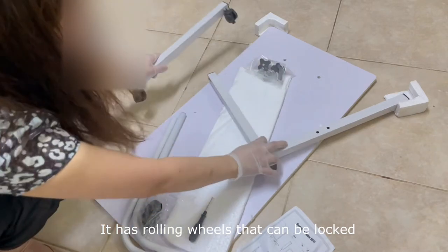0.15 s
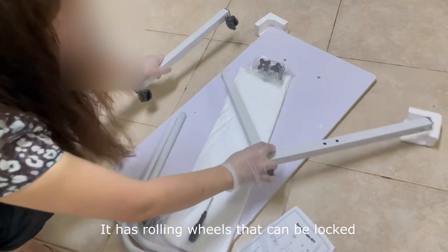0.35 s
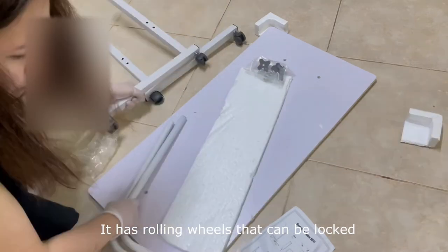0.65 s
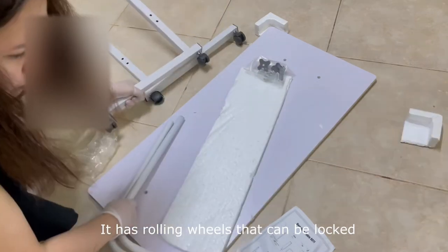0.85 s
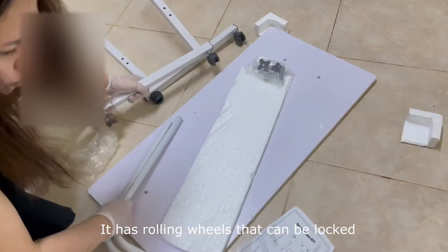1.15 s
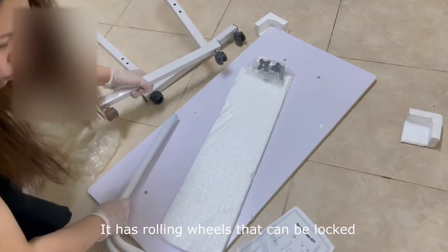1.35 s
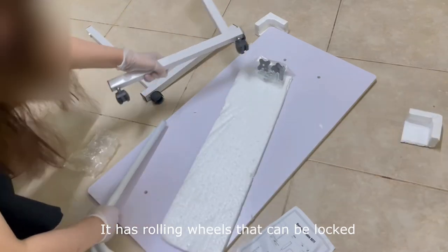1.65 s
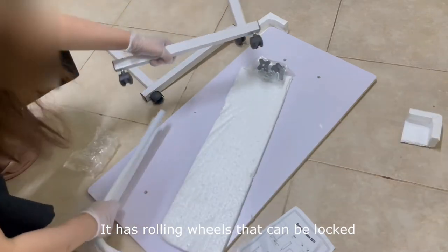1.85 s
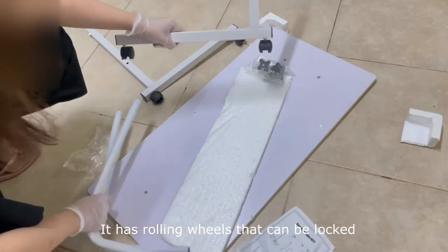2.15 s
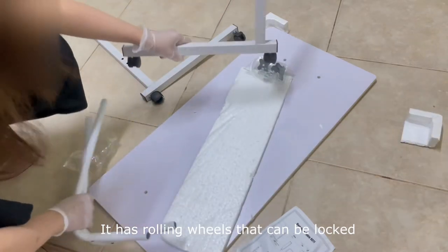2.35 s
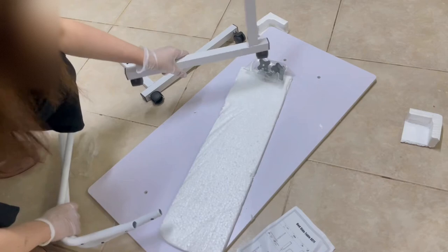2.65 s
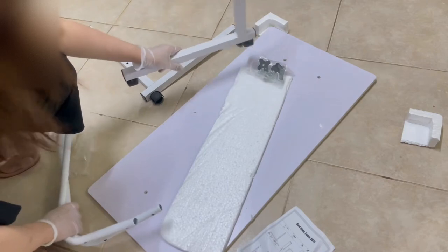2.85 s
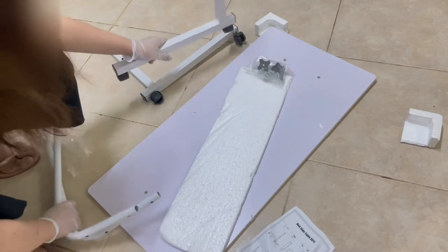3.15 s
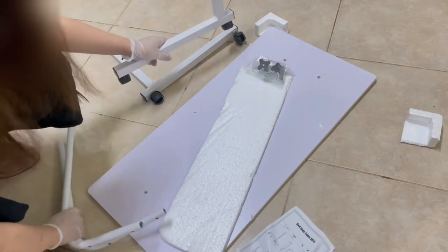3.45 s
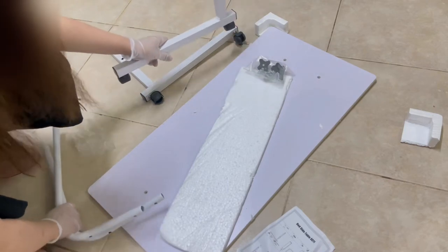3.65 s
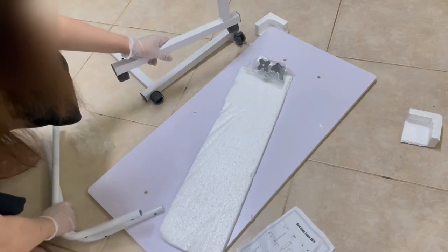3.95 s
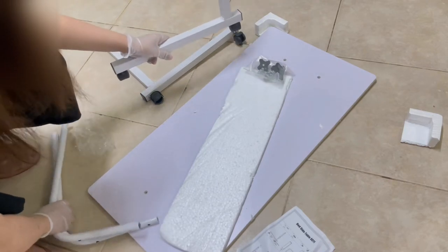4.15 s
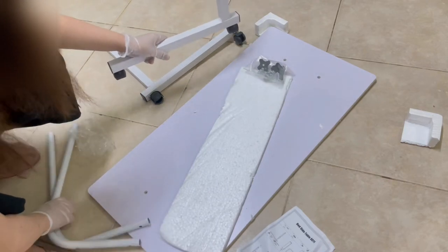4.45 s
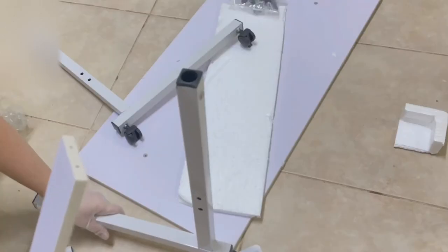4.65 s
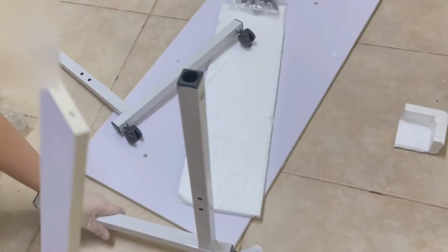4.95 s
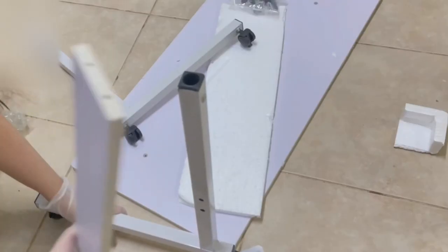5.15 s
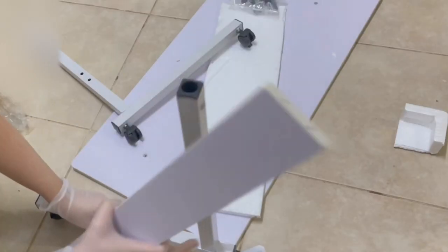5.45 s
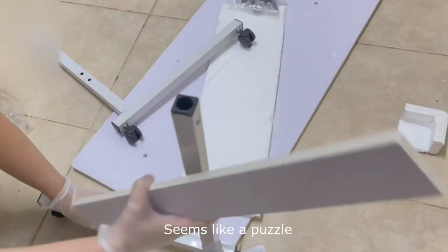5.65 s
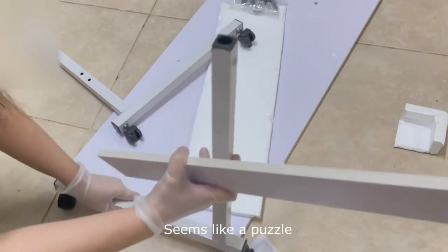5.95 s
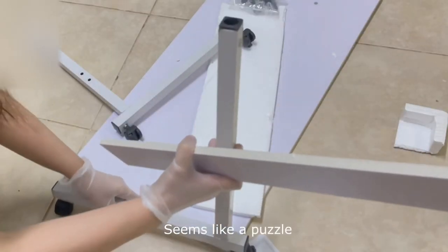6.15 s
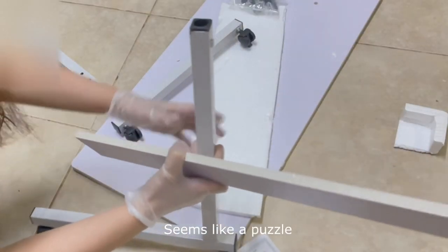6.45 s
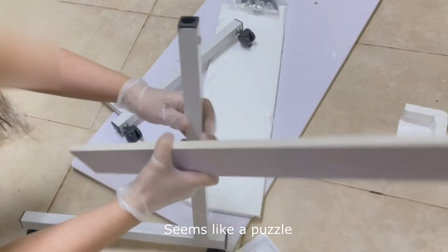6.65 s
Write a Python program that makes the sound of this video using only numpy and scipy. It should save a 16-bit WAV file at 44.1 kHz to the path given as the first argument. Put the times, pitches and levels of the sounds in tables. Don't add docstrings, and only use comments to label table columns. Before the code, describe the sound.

Gloved hands rustle and slide metal desk legs on tile, casters knock and a leg clangs, then a loud tube clang before quieter board taps.

```python
import sys
import numpy as np
from scipy import signal
from scipy.fft import rfft, irfft, next_fast_len
from scipy.io import wavfile
from scipy.ndimage import uniform_filter1d, minimum_filter1d, map_coordinates

SR = 44100
rng = np.random.default_rng(int(sys.argv[2]) if len(sys.argv) > 2 else 0)


def decibels_to_gain(level_db):
    exponent = np.asarray(level_db, float) / 20
    return 10 ** exponent


def unload_audio(sound):
    columns = np.transpose(np.atleast_2d(sound))
    steps = np.round(np.clip(columns, -1, 1) * 32767)
    wavfile.write(sys.argv[1], SR, steps.astype(np.int16))


N = 300321
TIME = np.arange(N) / SR
AGE = np.arange(SR // 2) / SR

# fade_start_s, silent_s, sound_back_s
CUT = (4.508, 4.518, 4.535)


def unit(x):
    return x / np.sqrt(np.mean(x ** 2) + 1e-20)


def along(points, hz):
    f, v = np.transpose(points)
    return np.interp(np.log(hz + 1), np.log(f + 1), v)


def curves(rows):
    s, *cols = np.transpose(rows)
    return [np.interp(TIME, s, c) for c in cols]


def wobble(rate):
    knots = rng.standard_normal(int(N * rate / SR) + 4)
    return map_coordinates(knots, [np.arange(N) * rate / SR])


def filtered(x, response):
    m = next_fast_len(x.shape[-1] + 8192)
    return irfft(rfft(x, m) * response(np.fft.rfftfreq(m, 1 / SR)), m)[..., :x.shape[-1]]


# freq_hz, likeness_0_to_1
ALIKE = [(60, .98), (250, .8), (1000, .5), (3000, .65), (7000, .88), (8300, .99), (16000, .99)]


def spread(hz):
    return np.arccos(np.clip(along(ALIKE, hz), -1, 1)) / 2


def pair(x, spectrum):
    mid, side = filtered(x, lambda hz: decibels_to_gain(along(spectrum, hz)) * [np.cos(spread(hz)), np.sin(spread(hz))])
    return unit(np.array([mid + side, mid - side]))


def rush(spectrum, patchy_db, grain_db=0):
    grain = decibels_to_gain(grain_db * uniform_filter1d(rng.exponential(size=N), 24) * 4)
    z = signal.stft(rng.standard_normal((2, N)) * grain, nperseg=512)[2]
    field = uniform_filter1d(rng.standard_normal(z.shape[1:]), 6, 0)
    field = unit(uniform_filter1d(field, 10, 1))
    noise = signal.istft(z * decibels_to_gain(patchy_db * field), nperseg=512)[1][:, :N]
    return pair(noise, spectrum)


FLUTTER_HZ = 70


def ring(modes, scatter_db, attack, free=1, flutter_db=0):
    hz, db, t60 = np.transpose(modes)[:, :, None]
    knots = rng.standard_normal((len(hz), FLUTTER_HZ))
    flutter = np.array([np.interp(AGE * FLUTTER_HZ, np.arange(FLUTTER_HZ), row) for row in knots])
    level_db = db + scatter_db * rng.standard_normal(hz.shape) + flutter_db * flutter
    strength = decibels_to_gain(level_db - 60 * AGE / (t60 * free))
    phase = 2 * np.pi * (hz * AGE + rng.random(hz.shape))
    step = np.sqrt(-np.log(along(ALIKE, hz)) / 2) * rng.standard_normal(hz.shape)
    sides = [np.sum(strength * np.sin(phase + side * step), axis=0) for side in (1, -1)]
    return np.array(sides) * (1 - np.exp(-AGE / attack))


def crack(t60, lo_hz, hi_hz, attack):
    turn = spread(np.sqrt(lo_hz * hi_hz))
    mid, side = rng.standard_normal((2, len(AGE))) * [[np.cos(turn)], [np.sin(turn)]]
    burst = np.array([mid + side, mid - side]) * decibels_to_gain(-60 * AGE / t60) * (1 - np.exp(-AGE / attack))
    band = signal.butter(3, [lo_hz, hi_hz], "band", fs=SR, output="sos")
    burst = signal.sosfilt(band, burst)
    return burst / np.abs(burst).max()


# freq_hz, t60_s
WALLS = [(200, 0.26), (1200, 0.36), (4000, 0.48), (10000, 0.3)]


def add(bus, s, sound, wet_db):
    hz, t, z = signal.stft(rng.standard_normal((2, len(AGE))), SR, nperseg=256)
    decay = decibels_to_gain(-60 * t / along(WALLS, hz)[:, None])
    tail = signal.istft(z * decay, SR, nperseg=256)[1][:, :len(AGE)]
    late = np.clip(AGE / 0.0041 - .5, 0, 1)
    tail = pair(tail * late, [(1, 0)]) / np.sqrt(len(AGE))
    both = decibels_to_gain(wet_db) * signal.fftconvolve(np.atleast_2d(sound)[:1], tail, axes=1)
    both[:, :len(AGE)] += sound * np.clip((AGE[-1] - AGE) * 10, 0, 1)
    end = CUT[1] if s < CUT[0] else N / SR
    start = round(s * SR)
    both = both[:, :round(end * SR) - start]
    bus[:, start:start + both.shape[1]] += both


SWELL_DB, RELEASE_DB_PER_S = 30, 170


def strokes(rows, idle_db):
    s, swell, hold, db = np.transpose(rows)[:, :, None]
    t = np.arange(0, N, 16) / SR
    before = np.clip(s - t, 0, None)
    after = np.clip(t - s - abs(hold), 0, None)
    shape_db = -SWELL_DB * before / abs(swell) - RELEASE_DB_PER_S * after
    shape_db = np.where((s < CUT[0]) & (t > CUT[1]), -200, shape_db)
    power = np.sum(decibels_to_gain(2 * np.maximum(db + shape_db, -200)), axis=0)
    return 10 * np.log10(np.interp(TIME, t, power) + decibels_to_gain(2 * idle_db))


# time_s, level_db, pitch_hz
DRONE = [(0.0, -63, 57.58), (0.3, -54, 59.3), (0.57, -66.5, 67.74), (1.35, -57.5, 58.3),
         (1.95, -63.5, 72.12), (2.5, -65.5, 57.95), (2.8, -61.5, 60.74), (3.43, -61, 60.1),
         (3.9, -64, 71.15), (4.1, -58, 57), (4.48, -70, 46.2), (4.56, -59, 43.76), (5.1, -58.5, 44.97),
         (5.2, -65, 50.07), (5.45, -53.5, 55.38), (5.8, -53.5, 57.3), (6.81, -56, 63.25)]
# freq_hz, level_db_per_hz
THROB = [(15, -42.5), (28, -13.5), (45, -4.5), (62, -4.5), (80, -8.5), (105, -19.5), (140, -52)]
# freq_hz, level_db_per_hz
AIR = [(53, -29.5), (90, -6.5), (171, -4.5), (267, -3), (432, -20), (468, -18), (584, -17.5), (758, -23),
       (873, -18.5), (1840, -53.5), (2920, -15), (3290, -39), (3790, -22.5), (4920, -57.5), (11000, -38.5),
       (14300, -68), (22000, -120)]
# pitch_hz, level_db
MACHINES = [(721, -81.5), (899, -76), (1198, -81.5), (1404, -86.5), (2400, -84.5), (2884, -79.5),
            (3800, -90.5)]
AIR_DB = -63


def room_tone():
    lines = 0
    for hz, db in MACHINES:
        level = decibels_to_gain(db + 3 + 0.84 * wobble(5.5))
        lines = lines + level * np.sin(2 * np.pi * hz * (TIME + 0.00013 * wobble(3.7)))
    drone_db, drone_hz = curves(DRONE)
    drone = decibels_to_gain(-1.0 + 1.4 * wobble(4.3)) * np.sin(2 * np.pi * np.cumsum(drone_hz) / SR)
    drone = drone + 0.81 * rush(THROB, patchy_db=4.0)
    return decibels_to_gain(AIR_DB - 1.5) * rush(AIR, patchy_db=1.4) + decibels_to_gain(drone_db) * drone + lines


# full_s, swell_s, hold_s, level_db
RUSTLES = [(0.001, 0.017, 0.0052, -37), (.09, 0.037, 0.21, -49.5), (.328, .02, 0.0046, -48),
           (.506, 0.018, 0.12, -58), (1.218, 0.35, 0.004, -57.5), (1.486, 0.13, 0.04, -53.5),
           (1.826, 0.041, 0.0067, -53.5), (2.352, .02, .06, -65.5), (2.49, 0.11, 0.056, -59),
           (2.65, 0.93, 0.033, -66.5), (2.904, 0.0081, 0.0032, -52), (2.95, .05, 0.04, -64),
           (3.102, 0.019, 0.11, -62), (3.37, 0.0097, 0.0039, -55.5), (3.6, 0.33, 0.043, -74),
           (3.965, 0.31, 0.2, -58.5), (4.348, 0.1, .01, -51.5), (5.01, 0.015, 0.13, -55.5),
           (5.088, 0.037, 0.031, -50), (5.22, 0.056, 0.023, -57), (5.35, 0.045, 0.24, -80),
           (5.71, 0.1, 0.19, -63.5), (6.15, 0.041, 0.049, -65.5), (6.3, 0.029, 0.023, -71),
           (6.485, 0.054, 0.0075, -52), (6.63, 0.3, 0.016, -54.5)]
# full_s, swell_s, hold_s, rub_db, drag_db
SLIDES = [(0.001, .01, 0.052, -48.5, -65), (0.092, 0.08, 0.25, -55.5, -60.5),
          (0.5, 0.015, 0.17, -56.5, -48.5), (1.095, 0.32, 0.084, -63, -58),
          (1.257, 0.052, 0.0087, -57.5, -48), (1.539, 0.14, 0.023, -43, -40.5),
          (1.59, 0.056, 0.22, -46.5, -52), (2.685, 0.84, 0.034, -59.5, -56.5),
          (2.911, 0.41, 0.085, -57, -60), (3.105, 0.027, 0.011, -58, -60), (3.379, 0.14, 0.009, -62.5, -59),
          (3.966, 0.079, 0.2, -51.5, -53), (4.246, 0.1, 0.011, -53.5, -56.5),
          (5.105, 0.29, 0.14, -62.5, -71), (5.714, 0.13, 0.0063, -52.5, -61), (5.855, .2, 0.02, -56, -84),
          (6.137, 0.02, .005, -49.5, -58.5), (6.511, 0.065, 0.11, -50.5, -59),
          (6.627, 0.036, 0.0089, -41, -67.5)]
# freq_hz, level_db_per_hz
HISS = [(1500, -44), (3200, -9.5), (4800, -2), (6500, -1.5), (9000, 3.5), (10400, -5.5), (11500, -13.5),
        (13000, -14.5), (16000, -17.5)]
SHEEN = [(9800, -51.5), (10600, -12.5), (12400, 0.5), (13200, -20), (15300, -3), (16300, -54)]
RUB = [(700, -42), (1500, -2.5), (2600, 1), (4200, -12), (7500, -29)]
DRAG = [(120, -53), (280, -4.5), (700, -4.5), (1400, -8.5), (3000, -40.5)]
IDLE_HISS_DB, IDLE_HISS_LATER_DB, IDLE_RUB_DB, IDLE_DRAG_DB = -76.5, -98, -74, -66.5


def hands():
    hiss_db = strokes(RUSTLES, np.where(TIME < CUT[1], IDLE_HISS_DB, IDLE_HISS_LATER_DB))
    rub_db = strokes([(s, swell, hold, db) for s, swell, hold, db, _ in SLIDES], IDLE_RUB_DB)
    drag_db = strokes([(s, swell, hold, db) for s, swell, hold, _, db in SLIDES], IDLE_DRAG_DB)
    hiss = decibels_to_gain(hiss_db - 3.0 + 0.64 * wobble(35)) * rush(HISS, patchy_db=2.5, grain_db=2.0)
    rub = decibels_to_gain(rub_db - 7.0 + 0.69 * wobble(25)) * rush(RUB, patchy_db=0.0, grain_db=3.0)
    drag = decibels_to_gain(drag_db - 3.0 + 0.39 * wobble(28)) * rush(DRAG, patchy_db=2.5, grain_db=1.5)
    sheen = decibels_to_gain(1.67 * hiss_db + 30) * rush(SHEEN, patchy_db=2.0, grain_db=2.5) * [[1], [-1]]
    return hiss + sheen + rub + drag


# start_s, low_1khz_db, mid_3khz_db, high_8khz_db, freedom_to_ring_0_to_1
CLANGS = [
    (0.004, -60, -44, -37, 0.2),
    (4.391, -19, -12, -25, 0.35),
    (4.3943, -32, -23.5, -7, 0.43),
    (4.417, -33.5, -27.5, -15.5, 0.12),
    (4.4247, -34.5, -25, -16.5, 0),
    (4.4395, -37, -25.5, -22, .1),
    (4.461, -25.5, -29.5, -26, 0.2),
]
END_BLOWS = [
    (4.3619, -31, -17, -12.5, 0.41),
]
LEG_BLOWS = [
    (1.5444, -25.5, -14, -8, 0.13),
    (1.547, -26.5, -20, -7, 0.069),
    (1.55, -19, -20.5, -6, 0.06),
    (1.5531, -20, -25, -26.5, .12),
    (1.564, -24.5, -28.5, -28, .08),
    (1.584, -35.5, -29.5, -26, 0.059),
    (1.612, -20.5, -23, -29, .14),
    (1.6505, -26, -25.5, -24, .15),
]
FRAME_BLOWS = [(3.2468, -40.5, -27.5, -29, 0.1), (3.2505, -40, -43, -32.5, .12), (3.266, -48, -38, -48, .1),
               (3.272, -54, -42, -35, 0.08), (3.275, -44, -46, -40, .05), (3.758, -40, -28.5, -33.5, 0.088),
               (3.776, -44, -52, -48, 0.12), (4.184, -39, -36, -36, 0.15), (4.187, -37, -33, -35, 0.14),
               (4.192, -37.5, -34, -33.5, 0.21), (4.197, -35.5, -33, -33.5, 0.1),
               (4.2033, -32.5, -39, -44, .1)]
TUBE_HZ = [668, 1104, 1345, 1640, 2176, 2421, 2454, 2642, 3198, 3575, 3604, 4575, 4650, 4775, 4824, 5566,
           5992, 6288, 6644, 6741, 7144, 7526, 7747, 8104, 8183, 8690, 8796, 9112, 9314, 9749, 11190, 11420,
           11850, 12110, 12350]
# level_db, t60_s
TUBE = [(-12.5, 0.89), (-18, 0.26), (6, 0.32), (-10, 0.43), (-11.5, 2), (-2, 0.5), (-7.5, 0.87),
        (-4.5, 0.4), (-7.5, 1.8), (-3.5, 1), (-7, 0.8), (-4, .8), (-7, 1.2), (-12.5, .6), (-8.5, .6),
        (-16.5, 0.5), (-17, 1), (-15.5, 0.6), (-15, 1.5), (-18, 1), (-21, 0.68), (-14.5, 0.88), (-20, 0.5),
        (-6.5, 0.29), (-18, 0.4), (-25, 0.8), (-7.5, 0.9), (-23, 1.4), (-17.5, 0.36), (-19.5, 1.2),
        (-23.5, 1.1), (-18.5, .5), (-19.5, .9), (-6, 0.5), (-9.5, .3)]
# pitch_hz, level_db, t60_s when free
END = [(666, -9.5, .8), (1628, -9, .9), (2180, -7, .9), (2650, -4.5, 0.29), (3627, -2, 0.62),
       (4576, -6, 0.46), (5520, -8.5, 0.39), (6029, -13, 0.84), (7640, -13, 0.46), (8678, -5, 0.25),
       (9330, -8.5, 0.4), (9690, -8.5, 0.79), (11230, -8, .3), (12110, -13.5, .3)]
LEG = [(883, -8, .5), (1105, -3, 0.8), (1377, -3, 0.8), (1577, -9, .6), (2020, -9, .6), (5609, -19, 0.71),
       (6300, -15.5, .8), (6864, -16.5, 0.68), (2412, 2, 0.88), (2690, -7.5, .6), (3164, -10.5, 0.7),
       (3600, -7, .8), (5020, -18.5, 0.96), (7540, -2.5, 0.29), (8280, -13, 0.65), (8780, -2, .4),
       (9040, 2.5, 0.27), (9800, -10.5, 0.67), (11100, -3, .55), (12400, -14, .9)]
FRAME = [(644.5, -6.5, 0.96), (1467, -6.5, 0.7), (1810, -7.5, 0.8), (2180, -10, 1), (2534, -9.5, 1.3),
         (2706, -4.5, 1.1), (3615, -6, 1), (4680, -11, 0.82), (4900, -14, 0.54), (5564, -12.5, 0.64),
         (6170, -15.5, .6), (6670, -15.5, .6), (7740, -14, .6), (8580, -8, 0.47)]
# low_hz, high_hz
SKIN = [(500, 1800), (1900, 3750), (4600, 12700)]


def clang(modes, blow, crack_db, skin_db, top_hz):
    _, low_db, mid_db, high_db, free = blow
    where = [(1000, low_db), (3000, mid_db), (8000, high_db)]
    free = np.clip(free, .03, 2)
    struck = [(hz, db + along(where, hz), t60) for hz, db, t60 in modes]
    tone = ring(struck, scatter_db=1.0, attack=0.00079, free=free, flutter_db=1.5)
    sound = decibels_to_gain(1.5) * free ** 0.5 * tone
    for (hz, part_db), (lo_hz, hi_hz) in zip(where, SKIN):
        contact = crack(0.0069, hz * .5, min(hz * 2.09, top_hz), attack=0.000079)
        sound += decibels_to_gain(part_db + crack_db) * contact
        walls = crack(0.56 * free, lo_hz, min(hi_hz, top_hz), attack=0.0003)
        sound += decibels_to_gain(part_db + skin_db) * walls
    return sound + decibels_to_gain(low_db - 18.5) * crack(0.021, 72, 300, attack=0.0012)


def tubes():
    bus = np.zeros((2, N))
    tube = [(hz, *mode) for hz, mode in zip(TUBE_HZ, TUBE)]
    # modes, blows, crack_db, skin_db, room_db, top_hz
    parts = [(tube, CLANGS, 3.5, -4.5, -7, 16500),
             (END, END_BLOWS, 1.5, -4, -7, 16500),
             (LEG, LEG_BLOWS, -1.5, -6.5, -9, 16500),
             (FRAME, FRAME_BLOWS, 3, -5, -7, 10000)]
    for modes, blows, crack_db, skin_db, room_db, top_hz in parts:
        for blow in blows:
            add(bus, blow[0], clang(modes, blow, crack_db, skin_db, top_hz), wet_db=room_db)
    return filtered(bus, lambda hz: decibels_to_gain(-14 * np.exp(-((hz - 4150) / 170) ** 2)))


# start_s, peak_db, pitch_hz, bright_db
RATTLES = [(0.327, -50, 2060, 21), (.255, -58.5, 450, -14), (.335, -51.5, 616, -10),
           (1.6122, -16, 2710, -2), (1.6193, -12, 2650, -19), (1.667, -18.5, 3000, -12),
           (1.683, -24, 2600, -15), (1.694, -25, 1500, -20), (1.885, -34, 1500, -15),
           (1.932, -27, 1800, -25), (1.941, -32, 2300, -25), (1.9142, -27, 3600, -4),
           (2.349, -48.5, 2957, 5), (2.43, -54, 4000, -2.5), (2.551, -47, 3970, 0), (2.563, -46, 4000, -5),
           (2.81, -51.5, 2500, 3), (2.909, -41, 3300, 11), (3.098, -46, 3500, 5), (2.6117, -44.5, 1276, 11),
           (2.615, -50, 5000, 6), (2.6562, -39, 3230, 8), (2.6692, -35.5, 3600, 7.5),
           (2.6871, -40, 3480, 4), (2.7107, -44, 1665, 5), (2.8767, -43, 3200, -5),
           (2.9046, -33.5, 3300, 10.5), (2.932, -33, 3540, 4), (2.972, -41, 1790, 12),
           (3.02, -48.5, 1440, 8.5), (3.105, -51, 1502, 17.5), (3.3698, -39.5, 1390, 7.5),
           (3.5554, -46, 1440, 9), (3.641, -66, 4000, 10), (3.792, -52, 3000, 5), (3.97, -37, 1700, -1),
           (4.087, -45, 2407, -10), (4.1177, -53, 2480, 10), (4.132, -54, 5000, 8)]
# start_s, peak_db, pitch_hz, bright_db
TAPS = [(5.095, -49, 1400, -8), (4.7464, -61, 1191, -34), (5.696, -42, 2440, -1),
        (5.7223, -26.5, 1980, -31), (6.1355, -29.5, 1835, -23.5), (6.1404, -32, 2336, -36),
        (6.311, -45, 1900, -30), (6.323, -42.5, 2100, -30), (6.454, -42, 2110, -30), (6.478, -33, 4180, 0),
        (6.487, -36, 2620, -15), (6.5023, -38, 2600, -15), (6.509, -44, 4200, -20),
        (6.5197, -33, 2250, -34), (6.573, -42, 1500, -27.5), (6.591, -22.5, 2290, -39),
        (6.6178, -39, 5930, -23), (6.623, -36, 2542, -30), (6.6298, -31.5, 5400, -24),
        (6.6294, -24.5, 1600, -27), (6.6836, -45, 1508, -13), (6.638, -37, 3100, -25),
        (6.654, -42, 2010, -25.5), (6.719, -46, 2300, -30)]
DULL_DB, DULL_DB_PER_OCTAVE = -1.5, -13


def ticks():
    bus = np.zeros((2, N))
    for s, db, hz, bright_db in RATTLES + TAPS:
        size = 1 if s < CUT[0] else 1.4
        dull_db = DULL_DB + DULL_DB_PER_OCTAVE * np.log2(hz / 1000)
        tone = .35 * ring([(hz, 0, .01)], scatter_db=0, attack=.0004)
        tone += crack(.009 * size, hz * .6, hz * 1.5, attack=.0003)
        dull = decibels_to_gain(dull_db) * crack(0.043, 370, 1210, attack=0.00093)
        bright = decibels_to_gain(bright_db + 0.5) * crack(0.0034, 5500, 12500, attack=0.00032)
        add(bus, s, decibels_to_gain(db - 2.0) * (tone + dull + bright), wet_db=-6.5)
    return bus


# start_s, peak_db, snap_db, wheel_pitch_factor, fork_db
KNOCKS = [
    (1.2505, -37, -13, 1, -40),
    (1.6107, -15, -20, 1.73, -42),
    (1.6156, -15, -20, 1.27, -38),
    (1.65, -24.5, 8, 1.9, -38),
    (1.864, -18, 2, 1.04, -27),
    (1.9146, -14.5, -25, 1.044, -27),
]
# pitch_hz, level_db, t60_s
WHEEL = [(165, -19.5, 0.094), (365, -17, 0.065), (610, -10.5, 0.034), (945, 0, 0.019), (1070, 4, 0.029),
         (1504, -1.5, 0.027), (1824, -9, 0.015), (2240, -11, 0.013), (3000, -11, 0.015)]
FORK_HZ, FORK_T60_S = 6336, .1


def casters():
    bus = np.zeros((2, N))
    lag_s = .003
    for s, db, snap_db, pitch, fork_db in KNOCKS:
        hollow = decibels_to_gain(-7.5) * ring(np.multiply(WHEEL, [pitch, 1, 1]), scatter_db=-1.5, attack=0.00048)
        wheel = 0.42 * crack(0.096, 900 * pitch, 2300 * pitch, attack=0.00049)
        wheel += 0.19 * crack(0.064, 220, 1100, attack=0.0014)
        wheel += 0.11 * crack(0.041, 2300, 6500, attack=0.0003)
        snap = crack(0.012, 8140, 9300, attack=0.00093) + 1.1 * crack(0.023, 6800, 13000, attack=0.00032)
        knock = np.roll(wheel, round(lag_s * SR), axis=1) + decibels_to_gain(snap_db) * snap
        steel = ring([(FORK_HZ, fork_db, FORK_T60_S)], scatter_db=0, attack=.003, flutter_db=1.5)
        add(bus, s + lag_s, decibels_to_gain(db) * hollow, wet_db=-11.5)
        add(bus, s, decibels_to_gain(db) * knock, wet_db=-7.5)
        if db > -30:
            add(bus, s, decibels_to_gain(db) * steel, wet_db=-15)
    return bus


AXLE_HZ, AXLE_T60_S, AXLE_DB = 4888, 1.05, -41
AXLE_STRUCK_S, AXLE_TOUCHED_S, AXLE_HELD_DB_PER_S = 1.612, 2.1, 300


def axle():
    age = np.clip(TIME - AXLE_STRUCK_S, 0, None)
    held = np.clip(age - AXLE_TOUCHED_S + AXLE_STRUCK_S, 0, None)
    level_db = AXLE_DB - 60 * age / AXLE_T60_S - AXLE_HELD_DB_PER_S * held + 1.5 * wobble(30.03)
    return decibels_to_gain(level_db) * (1 - np.exp(-age / .03)) * np.sin(2 * np.pi * AXLE_HZ * age)


# start_s, peak_db, pitch_hz, t60_s
PINGS = [
    (1.651, -44, 11300, 0.24),
    (1.652, -44, 12090, 0.26),
    (1.73, -43.5, 2460, 0.22),
    (1.818, -46, 6400, .12),
    (2.965, -52, 469, .12),
    (6.477, -27, 2310, 0.025),
    (6.579, -38, 4300, 0.018),
    (6.636, -44, 3104, 0.16),
]


def pings():
    bus = np.zeros((2, N))
    for s, db, hz, t60 in PINGS:
        note = ring([(hz, db + 0.5, t60)], scatter_db=4.5, attack=0.0016, flutter_db=7.0)
        add(bus, s, note, wet_db=-15)
    return bus


# full_s, swell_s, hold_s, level_db
SCRAPE = (4, 0.58, -2.1, -55.5)
SCRAPE_WIDTH_HZ = 59.8


def scrape():
    grit = rng.standard_normal((2, N)) * decibels_to_gain(5 * wobble(330) + 2.5 * wobble(40))
    w = SCRAPE_WIDTH_HZ

    def tube(f):
        return sum(decibels_to_gain(db) * 1j * f * w / (c * c - f * f + 1j * f * w) for c, (db, _) in zip(TUBE_HZ, TUBE))

    colour = [(900, -11.5), (1400, -2.5), (2300, 3), (5000, -6), (9000, -5.5)]  # (Hz, dB)
    return decibels_to_gain(strokes([SCRAPE], -200)) * pair(filtered(grit, tube), colour)


# time_s, pitch_hz, level_db
SQUEAK = [
    (6.375, 2617, -67.5),
    (6.42, 2593, -75),
    (6.475, 2520, -69),
]


def squeak():
    hz, db = curves(SQUEAK)
    touch = np.clip(np.minimum(TIME - SQUEAK[0][0], SQUEAK[-1][0] - TIME) / 0.0078, 0, 1)
    level = decibels_to_gain(db + 6.5 + 4 * wobble(90))
    return touch * level * np.sin(2 * np.pi * np.cumsum(hz * (1 + 0.0338 * wobble(200))) / SR)


def scene():
    sound = tubes() + scrape() + casters() + axle() + ticks() + pings() + hands() + squeak() + room_tone()
    start, silent, back = CUT
    return sound * decibels_to_gain(np.interp(TIME, [start, start + 0.0052, silent, back], [2.0, -24.5, -26, 2.0]))


# freq_hz, level_db
MIC = [(4450, -1), (6500, -3.5), (8800, 0.5), (10000, 11), (10800, -2), (12300, -13.5), (13000, -18),
       (15800, -16), (16500, -46.5)]
# freq_hz, lead_radians
PORTS = [(100, 0), (1000, -.3), (2900, 1.3), (3700, -.2), (7700, .8), (8550, 0), (9300, -1.3)]
# freq_hz, lead_half_turns
OPPOSED = [(9850, -1), (10950, -1), (11500, -2), (12800, -2), (13300, -3), (14600, -3), (15200, -4)]
# freq_hz, level_db
LEFT_DB = [(100, 2), (700, 1), (2500, 3), (4500, 5.5), (8500, 1.5), (9900, 2.5)]


def two_ports(dry):
    lead = PORTS + [(hz, np.pi * turns) for hz, turns in OPPOSED]

    def apart(hz):
        return decibels_to_gain(along(LEFT_DB, hz) / 2) * np.exp(.5j * along(lead, hz))

    return filtered(dry, lambda hz: decibels_to_gain(along(MIC, hz)) * [apart(hz), 1 / apart(hz)])


def thinned(x, margin_db, quiet_db, jump_db):
    hz, _, z = signal.stft([x[0] + x[1], x[0] - x[1]], SR, nperseg=1024)
    band = uniform_filter1d(uniform_filter1d(abs(z) ** 2, 9, 1), 2, 2)
    loud = (abs(z[:, (hz > 7000) & (hz < 10000)]) ** 2).mean(axis=(0, 1))
    attack = loud > np.roll(loud, 2) * decibels_to_gain(2 * jump_db)
    mask = np.where(attack, 0, loud * decibels_to_gain(2 * margin_db)) + decibels_to_gain(2 * quiet_db)
    untouched = hz < np.array([[9800], [8250]])
    keep = (band > mask) | untouched[..., None]
    mid, side = signal.istft(z * keep, SR, nperseg=1024)[1][:, :N] / 2
    return np.array([mid + side, mid - side])


def limited(x, top):
    need = np.minimum(1, top / (np.abs(x).max(axis=0) + 1e-9))
    return x * uniform_filter1d(minimum_filter1d(need, size=441), size=441)


def low_pass(x):
    return signal.sosfilt(signal.butter(12, 16830, fs=SR, output="sos"), x)


def record(dry):
    thin = thinned(two_ports(dry), margin_db=-14, quiet_db=-97.0, jump_db=11)
    mix = limited(thin, top=.86)
    return low_pass(mix)


dry = scene()
out = record(dry)
unload_audio(out)
```